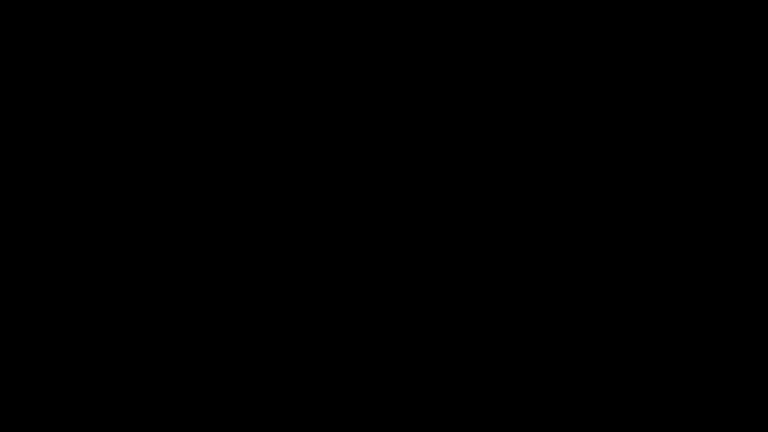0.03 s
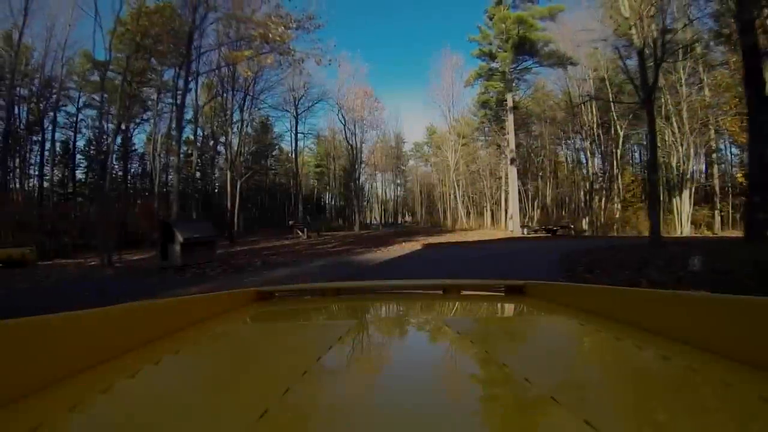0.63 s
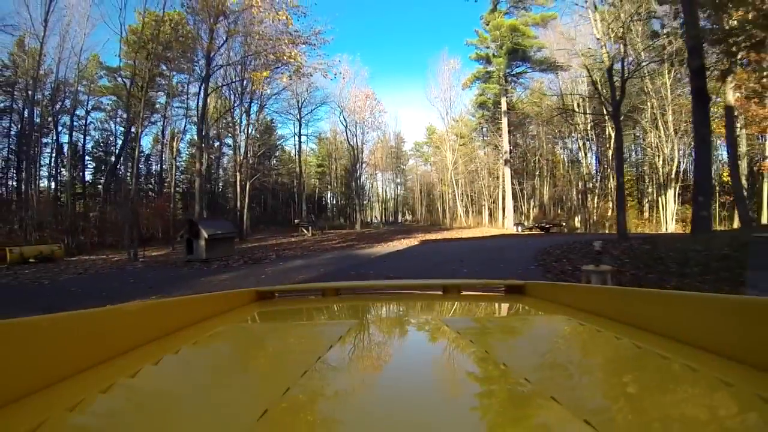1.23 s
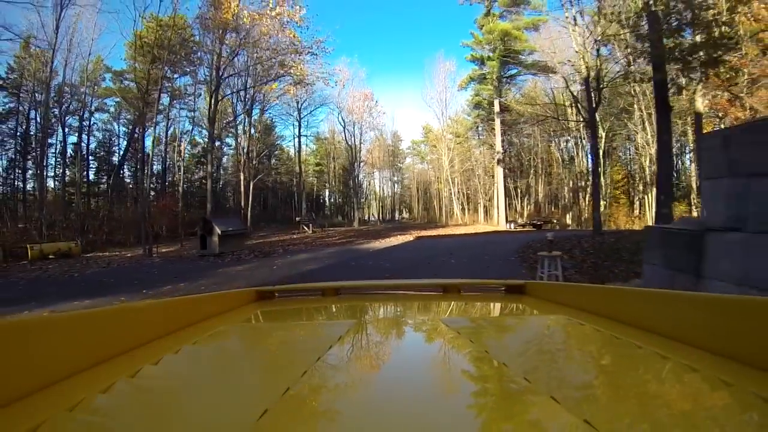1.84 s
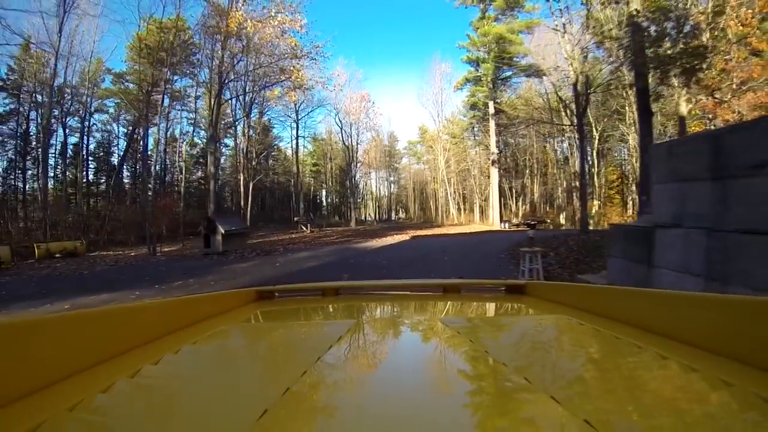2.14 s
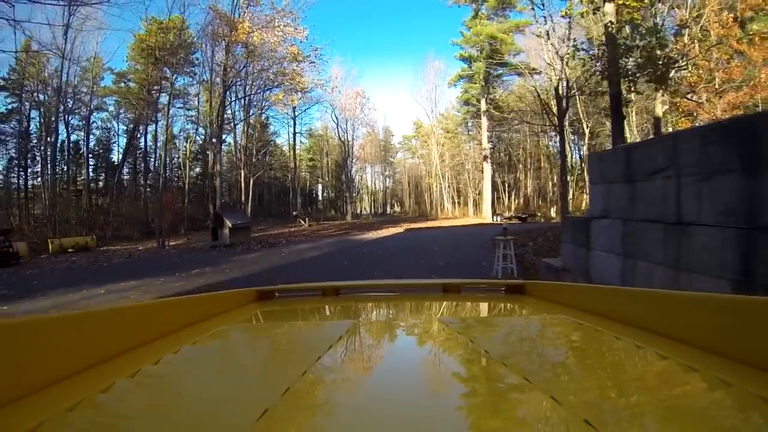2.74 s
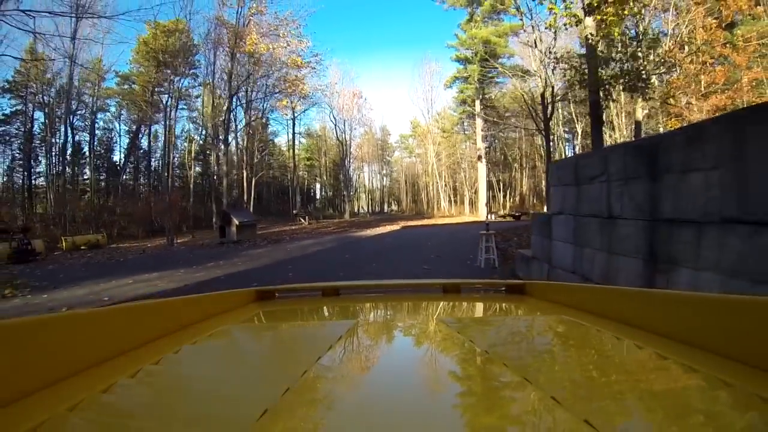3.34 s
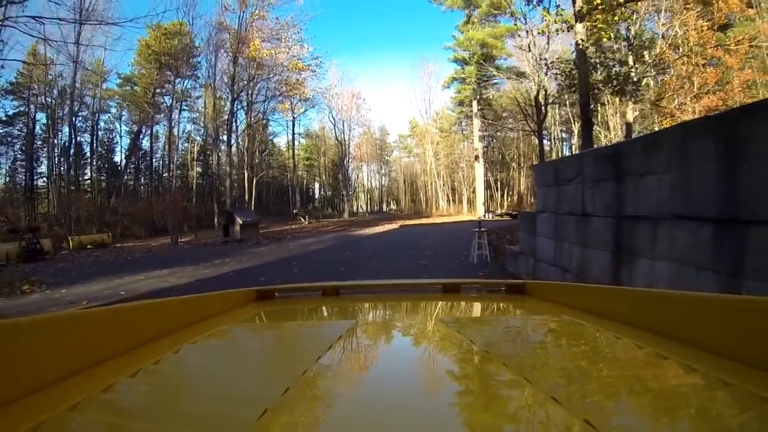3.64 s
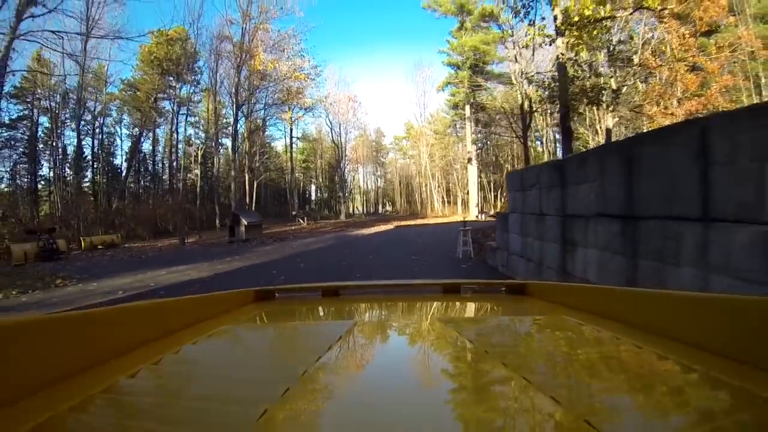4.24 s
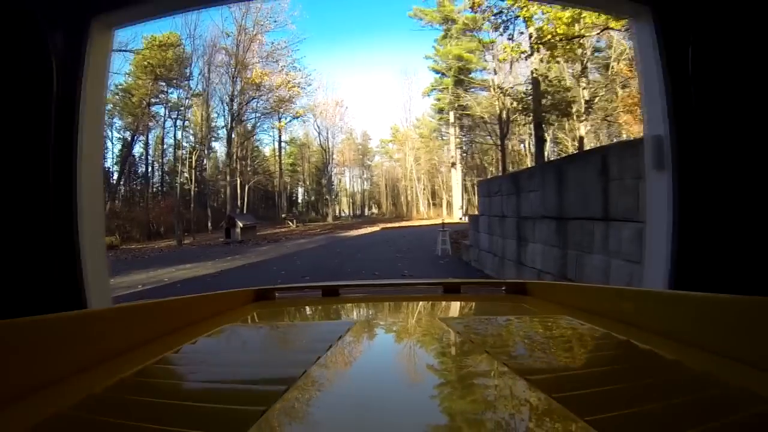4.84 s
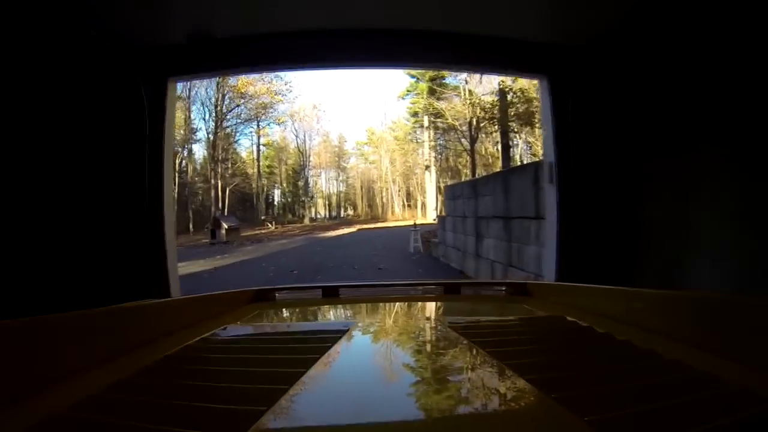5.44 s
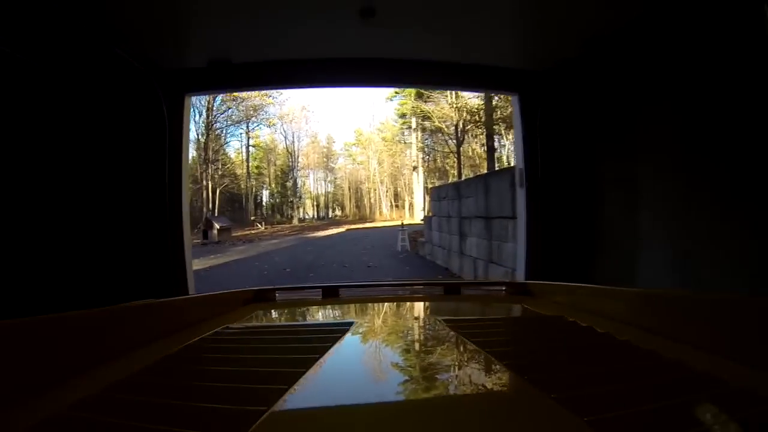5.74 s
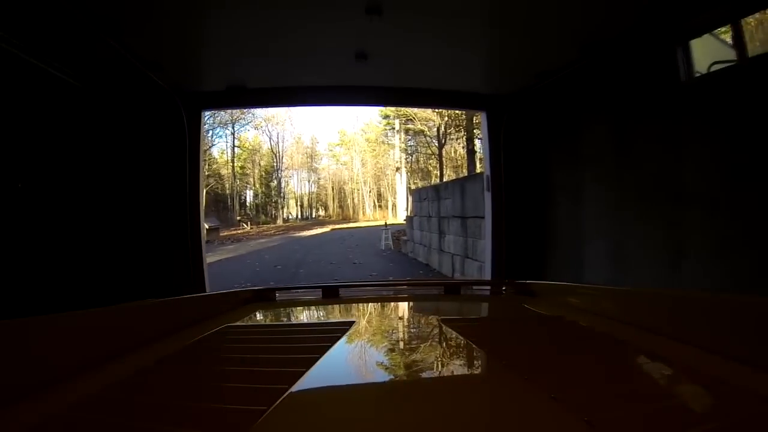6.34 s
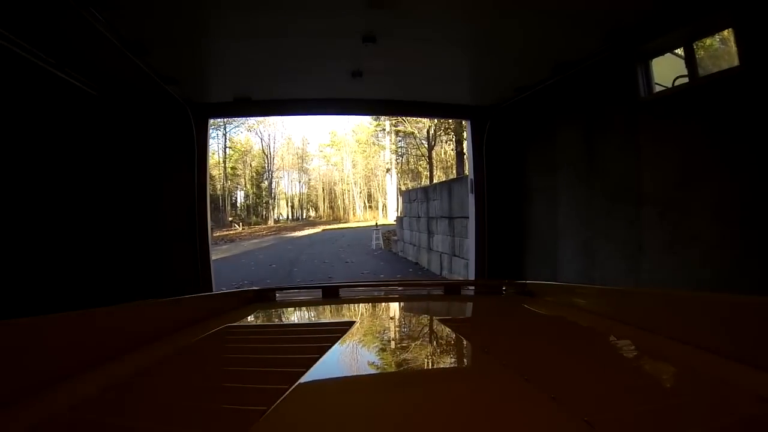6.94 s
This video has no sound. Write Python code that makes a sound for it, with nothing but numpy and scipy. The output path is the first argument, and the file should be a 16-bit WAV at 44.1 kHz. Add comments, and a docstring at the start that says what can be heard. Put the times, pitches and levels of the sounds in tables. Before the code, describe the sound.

A powerful sports car engine is heard very close, from a microphone riding on its rear deck. From the start it idles outdoors with a deep, booming, lumpy burble, wavering slightly, with small surges near the beginning and around 2 seconds. Valves tick and the engine bay hisses finely over a low body rumble. At about 3 seconds a light press of the throttle lifts the pitch and makes the exhaust louder, peaking near 3.5 seconds. It dips around 4 seconds, then a second gentle press peaks near 4.6 seconds. A faint belt whine and a little intake rasp come with both. From about 4 seconds, as the car backs into a garage, the walls thicken the clatter and add soft, shifting hums. The revs fall away, and from about 5.8 seconds the engine idles steadily in the enclosed space until the end, just after 7 seconds.

```python
"""A booming ten-cylinder idle, close up: the microphone rides on a sports car's rear deck.
The car backs into a garage on two light presses of the throttle and settles to idle again.
Its firings make the exhaust note, which unequal cylinders break into a lumpy burble under load.
Valves tick and injectors hiss in the engine bay, belt drives whine faintly, and the walls
thicken the noise as they close in around the microphone."""
import sys
import numpy as np
from scipy import signal
from scipy.fft import rfft, irfft
from scipy.io import wavfile

SR = 44100
rng = np.random.default_rng(int(sys.argv[2]) if len(sys.argv) > 2 else 0)


def log_audio(samples):
    """Write samples as a 16-bit WAV file to the path given in sys.argv[1]."""
    # one column per channel
    frames = np.atleast_2d(samples).T
    # limit to full scale, then quantise
    limited = np.clip(frames, -1, 1)
    pcm = np.round(limited * 32767).astype(np.int16)
    wavfile.write(sys.argv[1], SR, pcm)


N = 316638
T = np.arange(N) / SR
HZ = np.fft.rfftfreq(N, 1 / SR)
CYLINDERS, IDLE_HZ, MAX_CYCLES = 10, 80, 100


def amp(db):
    """Decibels to gain."""
    return 10 ** (np.asarray(db) / 20)


def unit(x):
    """Scales to rms 1."""
    return x / np.sqrt(np.mean(x ** 2) + 1e-20)


def curve(rows):
    """A timed table's value at every sample."""
    return np.interp(T, *np.transpose(rows))


def swell(s, half_s):
    """A bell-shaped rise and fall around s."""
    return np.exp(-((T - s) / half_s) ** 2)


def drift(hz):
    """Slow random wander, up to about hz."""
    return unit(irfft(rfft(rng.standard_normal(N)) / (1 + (HZ / hz) ** 4), N))


def colour(x, db):
    """Filters by a dB spectrum, to rms 1."""
    return unit(irfft(rfft(x) * amp(db), N))


def noise_band(hz, width_hz):
    """Noise through one steep resonance."""
    return colour(rng.standard_normal(N), -20 * np.log10(1 + (2 * (HZ - hz) / width_hz) ** 2))


def shape(points):
    """dB spectrum through the points, falling 48 dB an octave past its ends."""
    hz, db = np.transpose(points)
    octave, known = np.log2(HZ + 1), np.log2(hz)
    return np.interp(octave, known, db) - 48 * abs(octave - np.clip(octave, known[0], known[-1]))


def bumps(modes):
    """dB spectrum of a few peaks and notches."""
    return sum(db / (1 + (2 * (HZ - hz) / width) ** 2) for hz, width, db in modes)


def ringing(modes, ripple_db):
    """dB spectrum of a few strong modes among many weak, scattered ones."""
    weak = irfft(rfft(rng.standard_normal(len(HZ)))[:400], len(HZ))
    return bumps(modes) + ripple_db * unit(weak)


def firings(cycles, sizes):
    """One impulse a firing; sizes holds a row per cycle and a column per cylinder."""
    number = np.floor(cycles * CYLINDERS).astype(int)
    at = np.flatnonzero(np.diff(number))
    train = np.zeros(N)
    train[at] = sizes.ravel()[number[at]]
    return train


def ticking(cycles, share, spread_db, ring_s, chance_db=2):
    """Steady rush plus a burst at each valve event; every cylinder has its own strength."""
    own = rng.permutation(np.linspace(-1, 1, CYLINDERS))
    chance = np.minimum(rng.standard_normal((MAX_CYCLES, CYLINDERS)), 2)
    strikes = firings(cycles, amp(spread_db * own + chance_db * chance))
    bursts = unit(signal.lfilter([1], [1, -np.exp(-1 / (ring_s * SR))], strikes))
    return np.sqrt(1 - share + share * bursts ** 2) * rng.standard_normal(N)


# The walls closing in. Each row: time in seconds, nearness from 0 (outdoors) to 1 (parked inside).
WALL_NEARNESS = [(3.6, 0.17), (4.4, 0.87), (5.0, 0.74), (5.7, 0.96), (7.1, 1)]
# Engine bay sound thrown back at the deck by nearby surfaces. Each row: time in seconds, gain in dB.
BAY_REFLECTIONS = [(.2, 0.34), (1.9, 0), (2.4, -.8), (3.75, -0.7), (4.3, 4), (5.1, 5), (5.55, 7),
                   (5.9, 6.5), (6.4, 3), (6.85, 4.5)]
def garage():
    """How near the walls stand to the microphone, and the gain their reflections bring."""
    return curve(WALL_NEARNESS), curve(BAY_REFLECTIONS)


# The doorway and walls, all around the microphone. Each row: pitch in Hz, width in Hz,
# loudest moment in seconds, half length in seconds, level in dB.
GARAGE_HUMS = [(403, 130, 3.6, .33, -36.5), (230, 54, 4.9, .3, -28.5), (508, 37, 5.0, 0.21, -39.5),
               (500, 130, 5.8, 0.38, -40), (1450, 600, 4.7, 0.63, -45.5), (790, 110, 5.66, 0.31, -43.5),
               (305, 58, 6.2, 0.45, -42.5), (388.4, 6.2, 7.37, 0.81, -40)]
def wall_hums():
    """Resonances of the garage come and go as the car rolls through it."""
    return sum(amp(db) * swell(s, half_s) * noise_band(hz, width_hz)
               for hz, width_hz, s, half_s, db in GARAGE_HUMS)


def body_rumble(db=-43, waver_db=1.2):
    """Under the microphone the body shakes on its springs and mounts."""
    return amp(db + waver_db * drift(4.5)) * noise_band(hz=37, width_hz=20)


# Belt-driven parts, faint from the deck. Each row: multiple of the firing rate,
# loudest moment in seconds, half length in seconds, level in dB.
BELT_WHINES = [(10, 3.13, 0.036, -42), (15.75, 3.49, 0.31, -40.5), (13.9, 3.55, 0.35, -48),
               (10, 4.55, .2, -44), (20, 4.55, 0.17, -43.5), (10.2, 2.7, 0.038, -50)]
def belt_whines(cycles, waver_db=2, wobble_rad=.3):
    """Spinning parts sing thin lines that follow the engine speed and swell briefly."""
    out = np.zeros(N)
    for multiple, s, half_s, db in BELT_WHINES:
        level = amp(db + waver_db * drift(15)) * swell(s, half_s)
        out += level * np.sin(2 * np.pi * multiple * CYLINDERS * cycles + wobble_rad * drift(25))
    return out


def intake_rasp(load, full_load_db=-44):
    """Air rushes past the throttle while the engine pulls."""
    return amp(full_load_db) * load * noise_band(hz=4140, width_hz=1300)


# The engine bay's hiss at close range. Each row: frequency in Hz, relative level in dB.
HISS_SPECTRUM = [(2650, -20), (4400, -14), (5050, -19), (6300, -5), (7600, 1.5), (8000, 2), (9000, 0),
                 (9800, -3), (11100, -4.5), (12400, -12), (13300, -11), (14200, -19), (15200, -22)]
# Small metal parts ringing in the bay. Each row: frequency in Hz, width in Hz, gain in dB.
METAL_MODES = [(5740, 140, -2), (6560, 180, 1.5), (7220, 150, 4), (7340, 130, -4), (9050, 140, 3.5),
               (12000, 140, 6), (13080, 220, 5.5)]
def injectors(cycles, load, idle_share=.36, loaded_share=.21):
    """Fine ticks that the intake's hiss covers under load; a louder injector chinks once a cycle."""
    tick_share = idle_share + (loaded_share - idle_share) * load
    ticks = ticking(cycles, tick_share, spread_db=6, ring_s=.0055)
    hiss = colour(ticks, shape(HISS_SPECTRUM) + ringing(METAL_MODES, ripple_db=.6))
    once_a_cycle = np.exp(-(((cycles + .5) % 1 - .5) / .06) ** 2)
    chink_hz, width_hz = 8500, 2200
    resonance_db = -20 * np.log10(1 + (2 * (HZ - chink_hz) / width_hz) ** 2)
    chink = colour(once_a_cycle * rng.standard_normal(N), resonance_db)
    return amp(1.2) * hiss + amp(-14) * chink


# The bay from the deck, in the open and between walls. Each row: frequency in Hz, relative level in dB.
BAY_OUTDOORS = [(250, -23), (320, -7), (355, -15.5), (410, -8), (540, -17.5), (900, -18), (1100, -22),
                (1400, -22), (1550, -17.5), (2450, -18), (2900, -15.5), (3700, -20), (5000, -20.5),
                (6500, -18)]
BAY_INDOORS = [(250, 2.5), (315, 2.5), (360, -7), (480, -3.5), (580, -9), (1050, -11.5), (1350, -9.5),
               (1650, -10), (2400, -14), (2900, -11), (3700, -15), (5000, -16), (6500, -12.5)]
# Resonances of the bay and its panels. Each row: frequency in Hz, width in Hz, gain in dB.
PANEL_MODES = [(393.7, 12, 6), (607, 14, 5.5), (668, 6.5, 7), (789, 32, 5.5), (945, 61, 4), (1160, 68, 5),
               (1492, 36, 6.5), (1680, 33, 5.5), (1860, 60, 3.5), (2258, 52, 5.5), (2680, 20, 4.5),
               (3270, 79, 2), (4190, 210, 5), (4600, 90, 2)]
def valve_clatter(cycles, inside):
    """Valves ring the panels; near walls fill in the lower middle."""
    ticks = ticking(cycles, share=.1, spread_db=4, ring_s=.006)
    panels_db = ringing(PANEL_MODES, ripple_db=.5)
    outdoors = amp(5) * colour(ticks, shape(BAY_OUTDOORS) + panels_db)
    indoors = amp(4) * colour(ticks, shape(BAY_INDOORS) + panels_db)
    return (1 - inside) * outdoors + inside * indoors


def exhaust_flap(opens_s=2.93, opening_takes_s=.026, shuts_s=5.76, shutting_takes_s=.11):
    """A flap in the exhaust opens (1) as the car pulls away and shuts (0) again at idle."""
    opening = np.clip(.5 + (T - opens_s) / opening_takes_s, 0, 1)
    shutting = np.clip(.5 + (T - shuts_s) / shutting_takes_s, 0, 1)
    return opening - shutting


# Surges while the car idles outside. Each row: time in seconds, extra burble in dB.
IDLE_SURGES = [(.19, 5), (.33, 4), (1.69, 3.5), (2.07, 4), (2.21, 1.5)]
def surges():
    """Brief runs of harder burns lift the level, in dB."""
    return sum(db * swell(s, half_s=.02) for s, db in IDLE_SURGES)


# The exhaust pipes, heard from the deck. Each row: frequency in Hz, relative level in dB.
PIPE_SPECTRUM = [(20, -22), (45, -11), (65, -20), (100, -17), (135, 0.5), (170, -3.5), (220, 0.5),
                 (250, -11), (290, -24), (350, -37), (430, -22), (500, -24), (560, -42), (800, -41)]
def burble(cycles, load, flutter=.7):
    """No two burns are alike: their uneven puffs ring the exhaust pipes."""
    puffs = unit(firings(cycles, rng.standard_normal((MAX_CYCLES, CYLINDERS))))
    gas = puffs + flutter * rng.standard_normal(N)
    return amp(-.3 - 2.5 * load) * colour(gas, shape(PIPE_SPECTRUM))


# Lines that unequal cylinders put in the exhaust. Each row: multiple of the four-stroke cycle rate,
# relative level in dB at idle, the same under load.
LOPE_LINES = [(5, -8, -18), (12, -19, -6), (13, -21, -3), (14, -21, -9), (15, -2, -3), (16, -14, -20),
              (17, -8, -15), (18, 0, -6), (19, -7, -9), (21, -13, -10), (22, -10, -14), (23, -13, -19),
              (24, -13, -23), (25, -8, -21), (26, -20, -30), (28, -8, -28), (29, -17, -30), (30, -11, -22),
              (35, -18, -31), (37, -21, -29), (39, -20, -31), (40, -18, -23), (42, -27, -25),
              (50, -16, -31), (53, -23, -32)]
# Tailpipe peaks and notches that they slide through. Each row: frequency in Hz, width in Hz, gain in dB.
TAILPIPE_MODES = [(151, 15, 2.5), (268, 32, -5), (362, 38, -5), (399, 37, 3)]
def lope(cycles, load):
    """The pattern of strong and weak cylinders repeats every cycle and deepens under load."""
    out = np.zeros(N)
    for multiple, idle_db, loaded_db in LOPE_LINES:
        db = (1 - load) * idle_db + load * loaded_db + 1.6 * drift(3)
        wander = .25 * drift(4)
        pipe_delay = rng.random()  # each line has its own, which spreads the beats over the cycle
        out += amp(db) * np.sin(2 * np.pi * (multiple * cycles + pipe_delay) + wander)
    return np.sqrt(2) * irfft(rfft(out) * amp(bumps(TAILPIPE_MODES)), N)


def silencer_boom(cycles, firing_hz, flap, inside, hz=153.5, width_hz=25.5):
    """The silencer resonates near the octave of the idle note; the open flap bypasses it."""
    detune = 2 * (2 * firing_hz - hz) / width_hz
    resonant = amp(-14 - 8 * flap) / np.hypot(1, detune)
    floor = amp(-27)
    level = np.hypot(resonant, floor) * amp(1.1 * inside + .6 * drift(9))
    return np.sqrt(2) * level * np.sin(4 * np.pi * CYLINDERS * cycles)


# Spots where a wall's echo cancels the firing note at the microphone.
# Each row: time in seconds, half length in seconds, dip in dB.
ECHO_NULLS = [(4.18, 0.14, -9), (4.66, 0.21, -4), (5.12, 0.05, -16), (5.42, 0.21, -26)]
def firing_note(cycles, octaves, flap, inside):
    """The clean tone of the exhaust pulses grows with engine speed while the flap is open."""
    null_db = sum(db * swell(s, half_s) for s, half_s, db in ECHO_NULLS)
    db = -26.5 + 22 * flap * octaves - 3 * inside + null_db + .4 * drift(10)
    return np.sqrt(2) * amp(db) * np.sin(2 * np.pi * CYLINDERS * cycles)


# The idle hunts outside, rises on two presses of the throttle and settles in the garage.
# Each row: time in seconds, firing rate in Hz.
FIRING_RATE = [(.1, 81.5), (.35, 73.3), (.69, 80), (.9, 77.3), (1.15, 80.9), (1.45, 79.9), (1.81, 85.6),
               (2.25, 78), (2.45, 81.2), (2.7, 79.5), (2.91, 82), (3.2, 101), (3.44, 111.8), (4.11, 100),
               (4.45, 113.5), (4.6, 116), (5.05, 96.5), (5.4, 86.5), (5.8, 79.8), (7.17, 80)]
def scene():
    """The car from its own rear deck, with the exhaust slightly right of the microphone."""
    firing_hz, flap = curve(FIRING_RATE), exhaust_flap()
    cycles = np.cumsum(firing_hz) / SR / CYLINDERS
    octaves = np.log2(firing_hz / IDLE_HZ)  # engine speed above idle
    load = flap * np.clip(octaves / .44, 0, 1)  # pulls hardest from .44 octaves up
    inside, reflected_db = garage()
    surge_db = surges()

    burble_db = -30 + 6 * octaves + 4.5 * flap + surge_db
    exhaust = firing_note(cycles, octaves, flap, inside)
    exhaust += silencer_boom(cycles, firing_hz, flap, inside)
    exhaust += amp(burble_db) * (lope(cycles, load) + burble(cycles, load))

    clatter_db = -41 + 4.8 * octaves + reflected_db
    hiss_db = -36 + 5.7 * octaves + reflected_db - 5.5 * inside + .5 * surge_db
    bay = amp(clatter_db) * valve_clatter(cycles, inside)
    bay += amp(hiss_db) * injectors(cycles, load) + belt_whines(cycles)

    lean_right = amp([[-.28], [.28]])
    return (exhaust + body_rumble()) * lean_right + bay + wall_hums() + intake_rasp(load)


# Thin steady tones from the electronics behind the microphone. Each row: pitch in Hz, level in dB.
ELECTRONIC_TONES = [(4000, -59), (8000, -64)]
def record(dry, start_s=.08, cutoff_hz=15200):
    """The electronics add faint tones and a constant offset; the sound comes in fast, band-limited."""
    tones = sum(np.sqrt(2) * amp(db) * np.sin(2 * np.pi * hz * T) for hz, db in ELECTRONIC_TONES)
    fade_in = np.clip((T - start_s) / .004, 0, 1)
    offset = np.array([[.264], [.2346]]) * (T >= start_s)
    lowpass = signal.firwin(511, cutoff_hz, window=("kaiser", 9), fs=SR)
    return signal.oaconvolve((dry + tones) * fade_in + offset, lowpass[None], "same")


dry = scene()
out = record(dry)
log_audio(out)
```